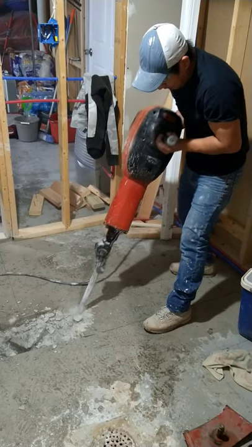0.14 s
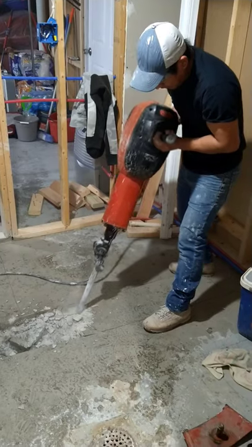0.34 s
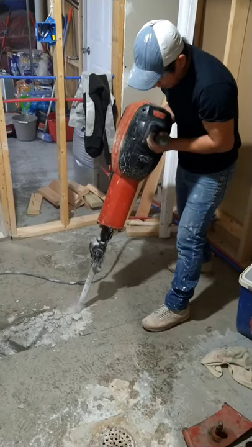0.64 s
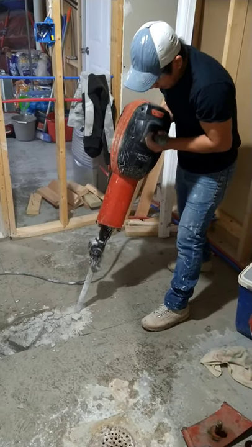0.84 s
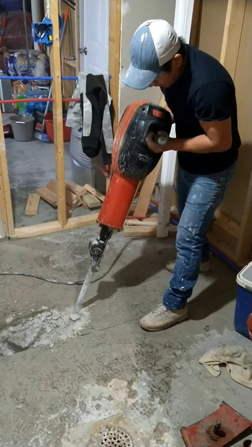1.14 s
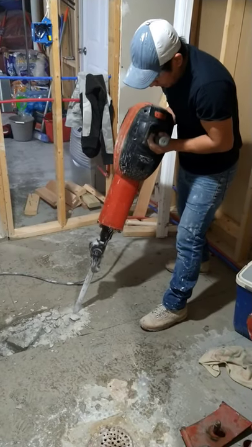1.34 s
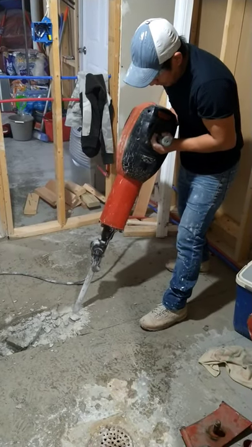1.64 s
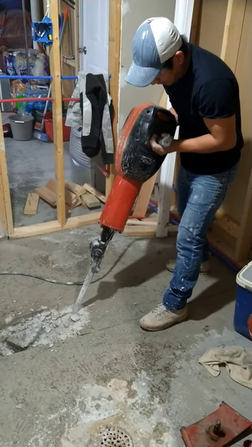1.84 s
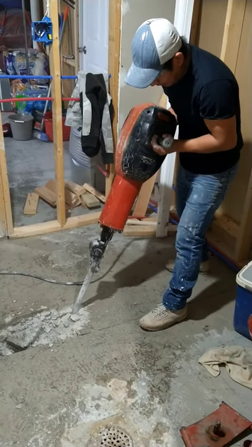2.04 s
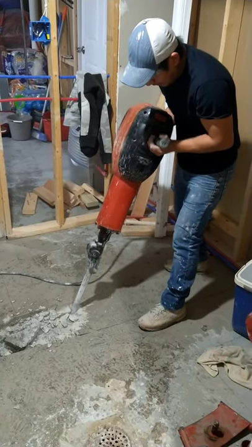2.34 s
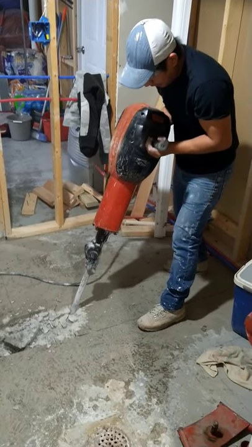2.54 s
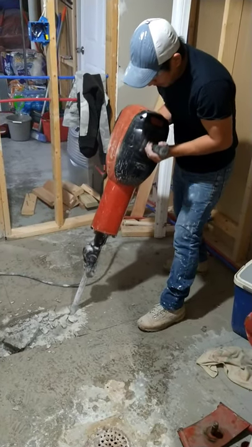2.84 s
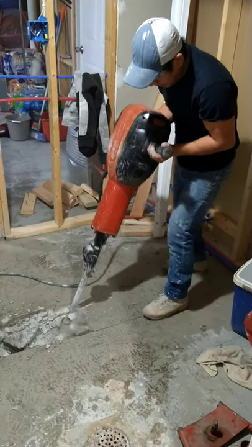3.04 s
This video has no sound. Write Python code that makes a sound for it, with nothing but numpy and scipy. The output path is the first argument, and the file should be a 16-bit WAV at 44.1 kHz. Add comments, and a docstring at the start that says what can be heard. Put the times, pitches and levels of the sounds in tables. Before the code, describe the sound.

An electric jackhammer chisels a concrete floor without a break, close by in a bare, half-built room. Rapid blows crack and ring over the motor's whirr, with rattling grit and a short echo.

```python
"""An electric jackhammer is already chiselling a concrete floor in a bare, half-built room.
Over the motor's whirr and hum, it strikes about 14 times a second. Each stroke starts with a soft thump;
then the concrete cracks, the steel chisel rings and the piston knocks in its casing. Grit and loose
parts rattle, and the room smears each blow into the next. About 2.5 seconds in, one dull bump sounds
underneath, and the hammering carries on to the end."""
import sys
import numpy as np
from scipy import signal
from scipy.fft import rfft, irfft, next_fast_len
from scipy.io import wavfile
from scipy.ndimage import uniform_filter1d, minimum_filter1d, map_coordinates

SR = 44100
rng = np.random.default_rng(int(sys.argv[2]) if len(sys.argv) > 2 else 0)


def wav_out(sig):
    """Save sig, one row per channel (or a flat mono array), as 16-bit PCM at SR to the path in sys.argv[1]."""
    wavfile.write(sys.argv[1], SR, np.round(np.clip(np.atleast_2d(sig).T, -1, 1) * 32767).astype(np.int16))


N = 140238


def amp(db):
    """Turn decibels into a number to multiply by."""
    return 10 ** (np.asarray(db) / 20)


def along(points, hz):
    """Read a table of (pitch_hz, value) rows at any pitch, sliding between the rows."""
    pitches, values = np.transpose(points)
    return np.interp(np.log(hz + 1), np.log(pitches + 1), values)


def fade(t, fade_s):
    """Start at t = 0 and die away, losing 60 dB every fade_s seconds."""
    return (t >= 0) * np.exp(-np.log(1000) * np.abs(t) / fade_s)


def filtered(x, response):
    """Turn each pitch in x up or down by the gain response(hz)."""
    size = next_fast_len(x.shape[-1] + SR // 4)
    gain = response(np.fft.rfftfreq(size, 1 / SR))
    return irfft(rfft(x, size) * gain, size)[..., :x.shape[-1]]


def add(track, start_s, sound):
    """Mix a sound into the track at start_s."""
    i = round(start_s * SR)
    part = sound[..., max(-i, 0):max(N - i, 0)]
    track[..., max(i, 0):max(i, 0) + part.shape[-1]] += part


def wander(rate_hz, t):
    """Random drift in a tone's strength and phase, as one complex curve for each side."""
    points = rng.standard_normal((4, 128))
    curves = np.array([map_coordinates(p, [t * 2 * rate_hz + 2], order=1, mode="mirror") for p in points])
    return curves[:2] + 1j * curves[2:]


# How alike left and right sound: pitch_hz, likeness (1 or more = the same, 0 = unrelated, -1 = opposite)
LIKENESS = [(30, 0.5), (100, 0.2), (200, 2.6), (350, -0.1), (700, 0.34), (1300, -0.25), (2500, 0),
            (14000, -0.32)]

def spread(noise_pair, colour):
    """Turn two noises into a left and right with the given tone colour and an average power of 1."""
    def response(hz):
        angle = np.arccos(np.clip(along(LIKENESS, hz), -1, 1)) / 2
        return amp(along(colour, hz)) * [np.cos(angle), np.sin(angle)]
    mid, side = filtered(noise_pair, response)
    stereo = np.array([mid + side, mid - side])
    return stereo / np.sqrt(np.mean(stereo ** 2) + 1e-20)


# When each blow lands and how strongly it cracks and rings: start_s, crack_db, low_ring_db, high_ring_db
BLOWS = [(0.0027, 4.5, -1.0, 0), (0.0728, 4, -3, -5), (0.142, 5, -2, -8), (0.2081, 2.5, -5, -2.5),
         (0.276, 4.5, -5, -4.5), (0.3436, 4, -0.5, -0.0), (0.4133, 5.2, 5, -0.5), (0.483, 4, -2, 0),
         (0.5548, 4, 1.5, 0), (0.6255, 2.2, -6, -4), (0.6961, 4, 0, 3), (0.7642, 1.5, -12, -2),
         (0.8324, 5.5, -9, -8), (0.9025, 3.5, -4, 0.0), (0.9728, 2, 0, -1), (1.0435, 3.5, -8, -5),
         (1.1127, 5.5, -1, -3), (1.1829, 4, -6, -4), (1.2525, 3, -5, -1), (1.3214, 3.5, -2, -1),
         (1.3909, 4, 3.5, 2), (1.4586, 4.3, 5, 0), (1.528, 5, -4, 1.5), (1.5973, 4.5, -4, 2.5),
         (1.6676, 3.0, 1, 3), (1.7365, 3, 2, 0), (1.8069, 3.5, -1.5, -7), (1.8753, 4, 3, 0.5),
         (1.9437, 2.5, 0, -7), (2.0121, 6, -6, -7), (2.0807, 1, 0.5, -6), (2.1493, 6, 2, -4),
         (2.2183, 4, -5, -2), (2.2876, 4, 1, -1.5), (2.3573, 3.5, -7, -4.5), (2.4276, 8, -7, 0),
         (2.4968, 2, -0.5, 2), (2.5684, 5, -10, -1.5), (2.6382, 4.5, -8, -2.0), (2.7067, 5, 6, -1.5),
         (2.7754, 0.0, 6, 0), (2.8433, 2.5, 8.5, -2.5), (2.9125, 2.5, 2, -2.0), (2.9804, 5.5, 7.5, -2.5),
         (3.05, 5, -3, -5), (3.1191, 4.0, 9.5, -2)]
CYCLE_S = .0694

def blows():
    """List every blow, with two before the start because the hammer is already running."""
    return [(BLOWS[0][0] - k * CYCLE_S, 0, 0, 0) for k in (2, 1)] + list(BLOWS)


# Tone colour of the motor and its fan: pitch_hz, level_db
MOTOR_COLOUR = [(20, -28), (50, -24), (100, -5), (450, -1), (2500, -1), (5500, -1), (8000, -44),
                (15000, -32)]

def motor_whirr():
    """The motor and its cooling fan make a steady rushing noise."""
    return amp(-25) * spread(rng.standard_normal((2, N)), MOTOR_COLOUR)


# Steady tones of the motor and gears: pitch_hz, level_db
HUM_TONES = [(395, 0), (436, -3), (479, .5), (536, -3), (577, -1), (845, -4.5), (1107, -3.5)]

def gear_hum():
    """The motor and gears hum on from stroke to stroke, wavering slightly."""
    t, track = np.arange(N) / SR, np.zeros((2, N))
    for hz, level_db in HUM_TONES:
        waver = 1 + .084 * wander(rate_hz=3.08, t=t)
        tone = np.exp(2j * np.pi * (hz * t + rng.random()))
        track += amp(level_db) * (waver * tone).real
    return amp(-35.5) * track


# A soft, deep bump: start_s, level_db
BUMPS = [(2.51, -38)]

def bump(pitch_hz=58.3):
    """One low note dies away quickly beneath the hammering."""
    t, track = np.arange(SR // 8) / SR, np.zeros(N)
    note = fade(t, fade_s=.045) * np.sin(2 * np.pi * pitch_hz * t)
    for start_s, level_db in BUMPS:
        add(track, start_s, amp(level_db) * note)
    return track


def floor_thump(start_hz=205, end_hz=95, length_s=.075, early_s=.016):
    """Each stroke pushes the floor slab, making a soft, low note that falls in pitch."""
    t, track = np.arange(SR // 8) / SR, np.zeros(N)
    progress = np.clip(t / length_s, 0, 1)
    hz = start_hz * (end_hz / start_hz) ** progress
    note = np.sin(np.pi * progress) * np.sin(2 * np.pi * np.cumsum(hz) / SR)
    for start_s, *_ in blows():
        add(track, start_s - early_s, note)
    return amp(-36.5) * track


# Tone colour of the knocks' echo in the room: pitch_hz, level_db
ECHO_COLOUR = [(60, -54), (95, -36), (170, 1), (220, -9.5), (290, 2), (430, 0), (660, 2), (850, 4.5),
               (980, -0.5), (1100, 1.5), (1250, -5), (5000, -38)]

def room_echo(fade_s=.235):
    """The room answers the piston's knocks (below) the same way every cycle, which makes a buzz."""
    t, track = np.arange(SR // 3) / SR, np.zeros((2, N))
    power = sum(amp(db) ** 2 * fade(t - delay_s, fade_s) ** 2 for delay_s, _, db, _ in KNOCKS)
    spectrum = rfft(np.sqrt(power) * rng.standard_normal((2, len(t))))
    echo = irfft(spectrum / np.abs(spectrum))  # make every pitch equally strong before colouring
    for start_s, *_ in blows():
        add(track, start_s, echo)
    return amp(-24.5) * spread(track, ECHO_COLOUR)


# Knocks of striker, piston and casing after each blow: delay_s, pitch_hz, level_db, fade_s
KNOCKS = [(0, 290, 0.5, 0.073), (0, 507, -0.5, 0.052), (.001, 850, -4.5, 0.031), (.013, 763, -2.5, 0.027),
          (.02, 449, -1.5, 0.035), (.023, 320, -1.5, 0.029), (.03, 582, -1.5, 0.038),
          (.046, 435, 0.5, 0.03)]

def piston_knocks(rise_waves=.77, pitch_scatter=.037, phase_shift_rad=.38):
    """The moving parts make the same run of short knocks every cycle, left and right a bit out of step."""
    t, track = np.arange(SR // 10) / SR, np.zeros((2, N))
    for delay_s, hz, level_db, fade_s in KNOCKS:
        rise = 1 - np.exp(-(t * hz / rise_waves) ** 2)
        shape = amp(level_db) * rise * fade(t, fade_s)
        phase = phase_shift_rad * np.array([[1], [-1]]) * rng.choice([-1, 1])
        for start_s, *_ in blows():
            knock_hz = hz * (1 + pitch_scatter * rng.standard_normal())
            add(track, start_s + delay_s, shape * np.sin(2 * np.pi * knock_hz * t + phase))
    return amp(-16.5) * track


# Tones of the steel chisel: pitch_hz, level_db, waver_hz, follows (share of the blow's ring_db, 0 to 1)
CHISEL_TONES = [(3030, -5.3, 40, .6), (4770, -1, 8, .9), (4835, -5.5, 55, .4), (5442, -3.5, 42, 0),
                (6819, -.2, 12, 1), (6928, -1.2, 22, 1), (9086, -9, 12, .1), (9285, -14, 60, .2),
                (10752, -8.5, 8, .2), (11579, -18, 25, .2), (11923, -19, 25, .2), (14653, -20, 25, .2),
                (15482, -5.3, 20, .3)]
# How nearby tones swell and sink as the chisel works in: pitch_hz -> rows of time_s, level_db
TONE_DRIFT = { 3020: [(.48, -2), (.7, 5), (.97, -1), (1.3, 2.5), (1.6, -1.5), (2.5, 0.5), (2.98, -2.5)],
              5435: [(.14, -3), (.42, -3), (.63, 0.5), (1.1, 0.5), (1.7, 2), (2.2, 1.5), (2.72, -4),
              (3.12, -4)], 9200: [(.85, -4.5), (1.3, 2), (1.94, 3), (2.08, 2), (2.15, 10), (2.5, 1.5),
              (2.77, -2.5), (2.88, 11), (3.0, -4)], 10750: [(0, 5.5), (.5, -6.5), (.63, 9.5), (.76, -1),
              (.84, 9.5), (1.18, 0.5), (1.6, -2), (1.95, 6.5), (2.5, -5), (3.12, -1)], 15480: [(.6, 6.5),
              (1.05, 2), (2.1, 6.5), (2.5, 9.5), (3.12, 9)], }
RING_RISE_S, RING_FADE_S, CHOKE_FADE_S = .0079, .63, .16
HIGH_RING_ABOVE_HZ, CHATTER_HZ, RING_SCATTER_DB = 6000, 130, 1.67

def chisel_ring():
    """Each blow rings the steel and the next chokes it; it chatters in its holder as it rings."""
    t, track = np.arange(SR // 4) / SR, np.zeros((2, N))
    slow_t = t[::63]  # loudness changes slowly, so fewer time steps will do
    rise = 1 - np.exp(-slow_t / RING_RISE_S)
    choke = fade(np.maximum(slow_t - CYCLE_S, 0), CHOKE_FADE_S)
    shape = rise * fade(slow_t, RING_FADE_S) * choke
    for hz, level_db, waver_hz, follows in CHISEL_TONES:
        drift = next((rows for near_hz, rows in TONE_DRIFT.items() if abs(near_hz - hz) < hz / 20), [(0, 0)])
        tone = np.exp(2j * np.pi * hz * t)
        for start_s, _, low_ring_db, high_ring_db in blows():
            steady = .081 * np.exp(2j * np.pi * rng.random())
            waver = .5 * wander(waver_hz, slow_t)  # the room's echoes make the tone waver
            chatter = .1 * wander(CHATTER_HZ, slow_t)
            ring = shape * (steady + waver + chatter)
            ring *= np.linalg.norm(shape) / np.linalg.norm(ring)  # wavering adds no energy
            ring = np.array([np.interp(t, slow_t, side) for side in ring])
            ring_db = high_ring_db if hz > HIGH_RING_ABOVE_HZ else low_ring_db
            drift_db = np.interp(start_s, *np.transpose(drift))
            scatter_db = RING_SCATTER_DB * rng.standard_normal()
            gain = amp(level_db + follows * ring_db + drift_db + scatter_db)
            add(track, start_s, gain * (ring * tone).real)
    return amp(-12) * track


# Tone colour of steel hitting concrete: pitch_hz, level_db
CRACK_COLOUR = [(100, -58), (400, -3.5), (900, -7.5), (1500, 2.5), (2400, -5.5), (3300, 1), (4200, -0.5),
                (5200, 4.5), (6200, -1), (7600, -9), (9200, -8), (10500, -11), (13000, -15), (15500, -31)]
CRACK_RISE_S, CRACK_FADE_S, ROOM_DB, ROOM_FADE_S = .00031, .041, -8, .58
GRIT_PER_S, GRIT_SCATTER_DB, GRIT_FADE_S = 81, 2, .0056

def concrete_cracks():
    """Each blow is a sharp burst of noise that lingers in the room; grit and loose parts tick along."""
    t, power = np.arange(SR // 2) / SR, np.zeros(N)
    rise = 1 - np.exp(-t / CRACK_RISE_S)
    room_tail = amp(ROOM_DB) * fade(t, ROOM_FADE_S)
    shape = rise * np.hypot(fade(t, CRACK_FADE_S), room_tail)
    for start_s, crack_db, *_ in blows():
        add(power, start_s, (amp(crack_db) * shape) ** 2)
    has_tick = rng.random(N) < GRIT_PER_S / SR
    ticks = has_tick * amp(GRIT_SCATTER_DB * np.clip(rng.standard_normal(N), -2, 2))
    rattle = np.abs(signal.fftconvolve(ticks ** 2, fade(t, GRIT_FADE_S) ** 2)[:N])
    cracks = spread(np.sqrt(power) * rng.standard_normal((2, N)), CRACK_COLOUR)
    grit = spread(np.sqrt(rattle * power) * rng.standard_normal((2, N)), CRACK_COLOUR)
    return amp(-13.5) * np.sqrt(power.mean()) * cracks + amp(-26.5) * grit


# How bright the cracks are: time_s, tilt_db (highs go up and lows go down by this much)
BRIGHTNESS = [(0, 1), (.25, 3.5), (0.501, -1.5), (.9, 1.5), (1.549, -2), (1.8, -1.5), (2.0, 3),
              (2.298, 1.5), (2.552, 0), (3.18, 2.5)]

def changing_concrete(cracks, low_hz=2200, high_hz=5500):
    """The cracks turn duller or brighter as the chisel finds new concrete."""
    tilt_db = np.interp(np.arange(N) / SR, *np.transpose(BRIGHTNESS))
    lows = filtered(cracks, lambda hz: 1 / (1 + (hz / low_hz) ** 8))
    highs = cracks - filtered(cracks, lambda hz: 1 / (1 + (hz / high_hz) ** 12))
    return cracks + (amp(-tilt_db) - 1) * lows + (amp(tilt_db) - 1) * highs


# Which side is louder at each pitch: pitch_hz, left_minus_right_db
BALANCE = [(110, 0), (200, -3.5), (380, -4.5), (700, -.5), (1300, -2), (2400, -1.5), (4800, 2.3), (5400, 1),
           (6700, 3), (9200, -2), (15500, -3.5)]

def scene():
    """Add up all the sounds and lean each pitch to the left or right."""
    background = motor_whirr() + gear_hum() + bump() + floor_thump() + room_echo()
    hammer = piston_knocks() + chisel_ring() + changing_concrete(concrete_cracks())
    return filtered(background + hammer, lambda hz: amp(np.outer([.5, -.5], along(BALANCE, hz))))


def record(dry, top_hz=15750, ceiling=.92, smooth_s=.003):
    """Cut the very highest pitches and briefly turn down any peak that passes the ceiling."""
    x = filtered(dry, lambda hz: hz < top_hz)
    size = round(smooth_s * SR)
    needed_gain = ceiling / np.maximum(np.abs(x), ceiling)
    held_gain = minimum_filter1d(needed_gain, 2 * size, axis=1)
    smooth_gain = uniform_filter1d(held_gain, size, axis=1)
    return filtered(x * smooth_gain, lambda hz: hz < top_hz)


dry = scene()
out = record(dry)
wav_out(out)
```